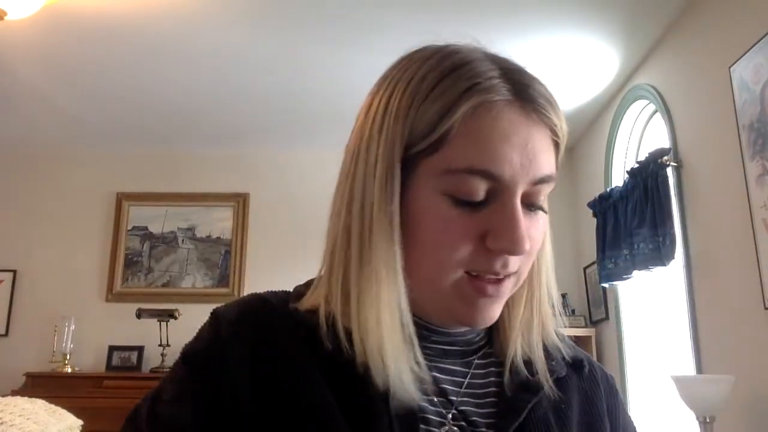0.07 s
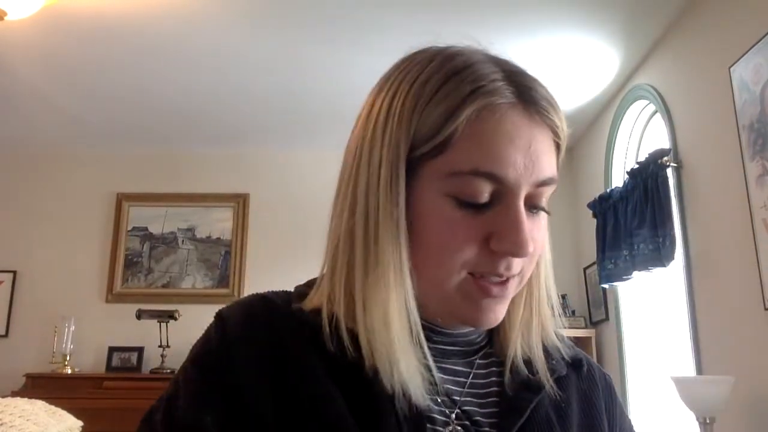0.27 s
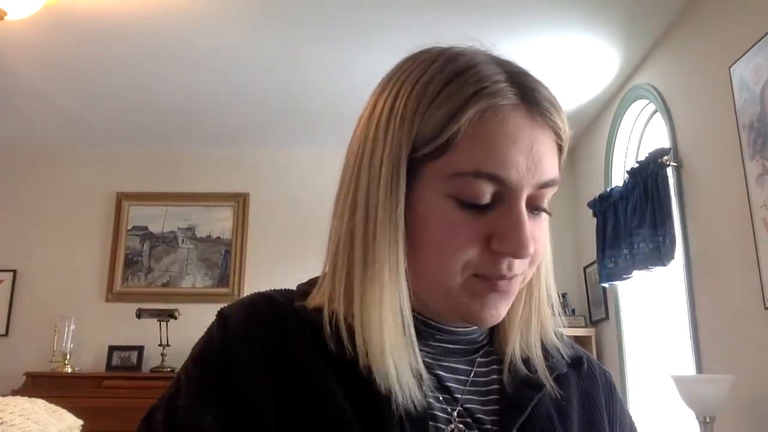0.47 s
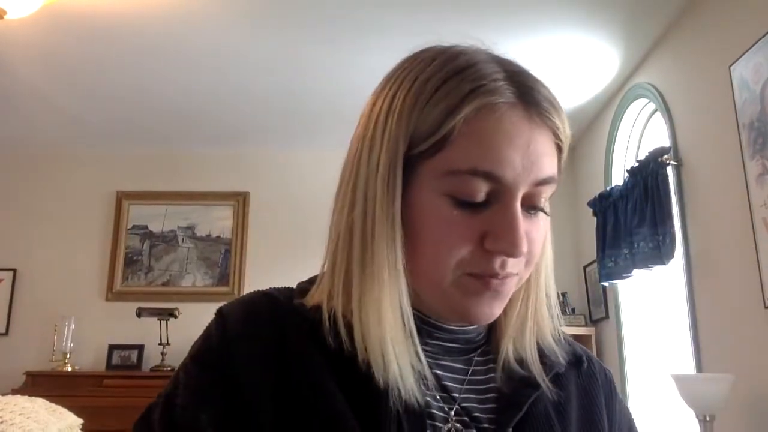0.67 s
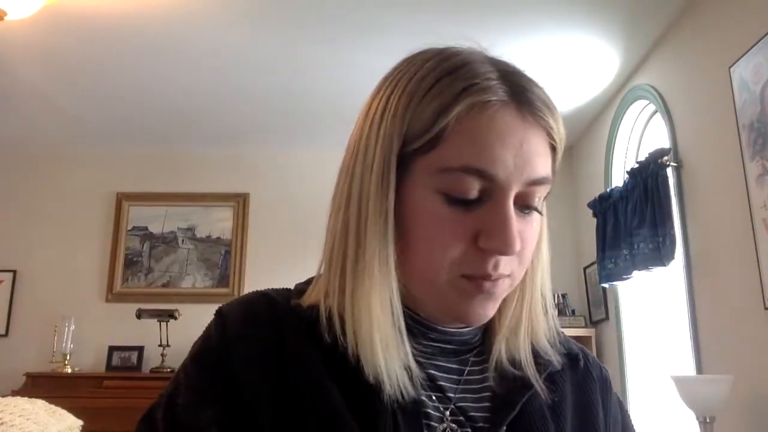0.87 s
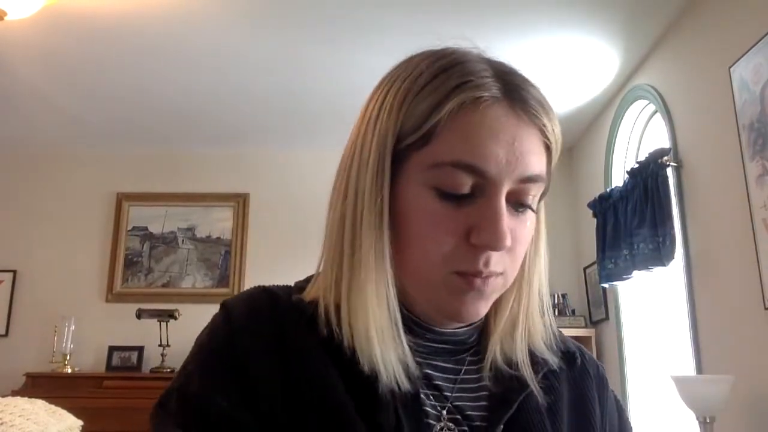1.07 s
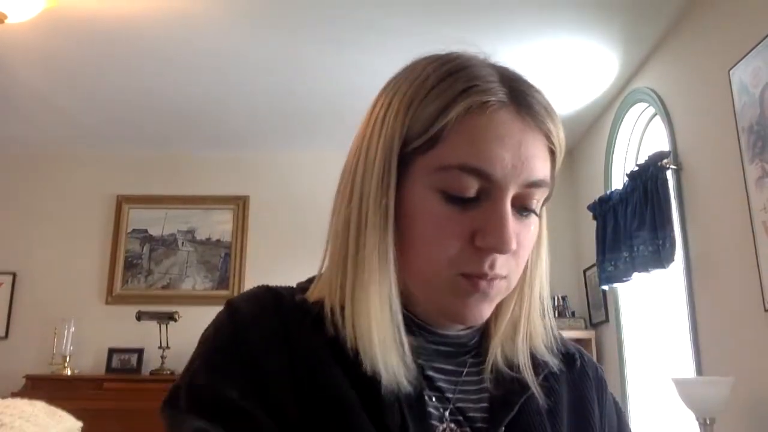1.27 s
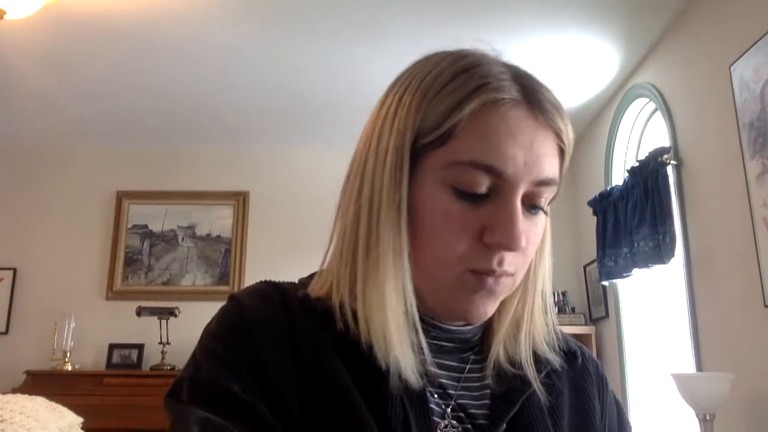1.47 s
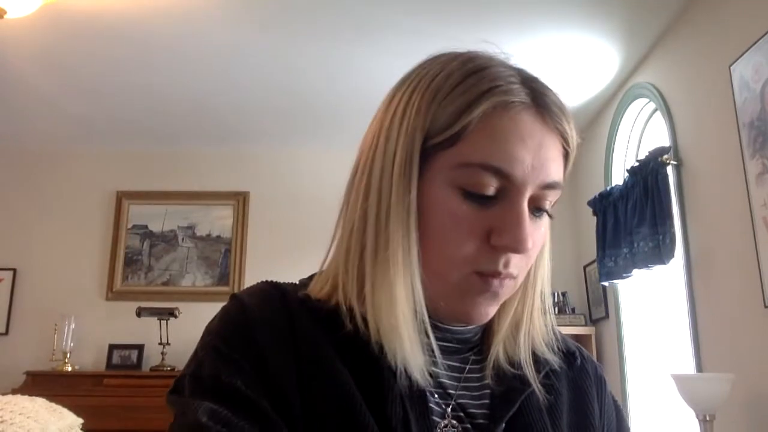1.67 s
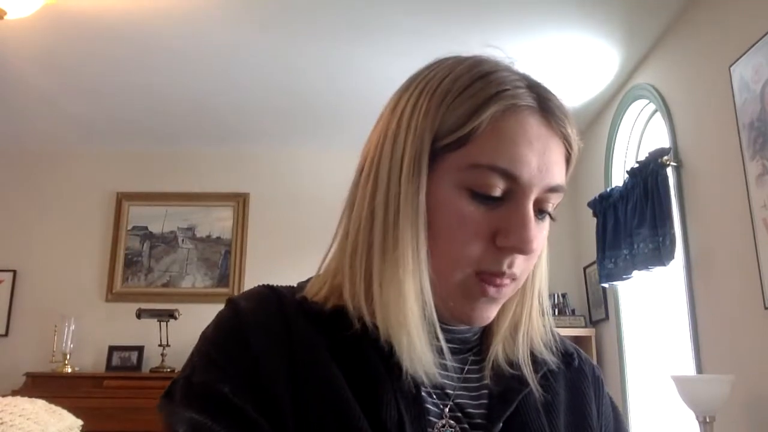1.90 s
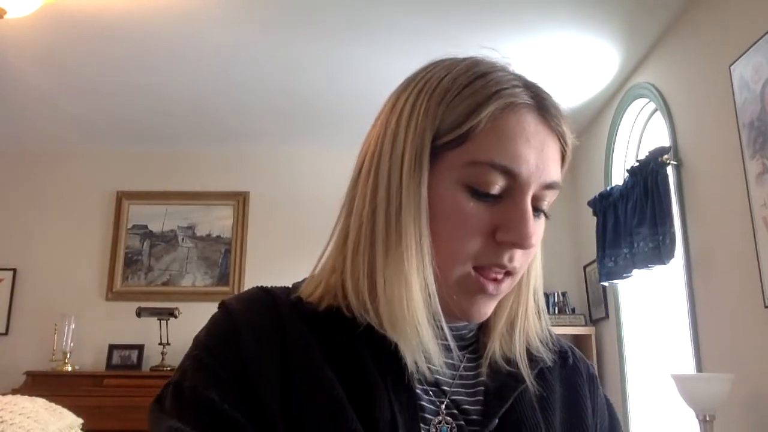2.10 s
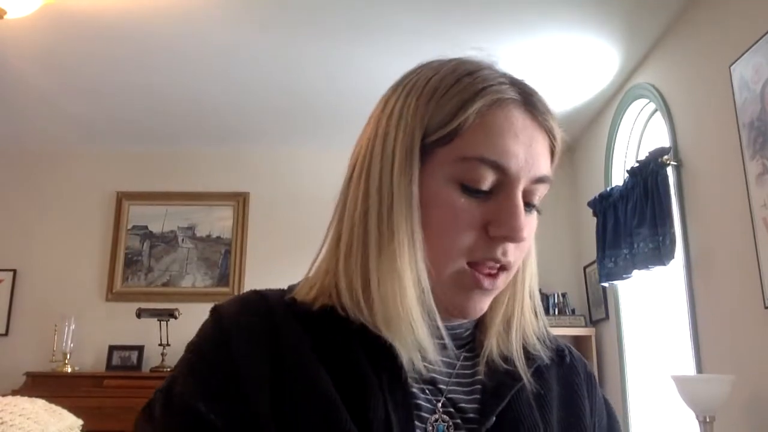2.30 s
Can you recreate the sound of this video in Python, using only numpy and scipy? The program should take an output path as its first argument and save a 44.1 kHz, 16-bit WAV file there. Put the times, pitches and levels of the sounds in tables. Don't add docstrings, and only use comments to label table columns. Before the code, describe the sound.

Plastic discs rub and tap softly, then pour with a bright clattering rattle onto a plastic tray

```python
import sys
import numpy as np
from scipy import signal
from scipy.fft import rfft, irfft
from scipy.io import wavfile
from scipy.ndimage import uniform_filter1d

SR = 44100
rng = np.random.default_rng(int(sys.argv[2]) if len(sys.argv) > 2 else 0)


def wav_out(sig):
    wavfile.write(sys.argv[1], SR, np.round(np.clip(np.atleast_2d(sig).T, -1, 1) * 32767).astype(np.int16))


def undo_db(level):
    steps = np.asarray(level, float) / 20
    return 10 ** steps


N = 103458
HIT_N = 6600
RIM_HZ, RIM_T60 = 11406, 0.023
LOW_T60 = 0.044
ROUGH, RING_ROUGH = 0.62, 0.45


# t/s, crack level/dB, tray level/dB and rim level/dB (both against the crack)
CLEAR_HITS = [(1.5435, 0, -8.5, -12.5), (1.5714, 4, -28.5, -33), (1.6173, -6, -8.5, -27),
              (1.6347, -12.5, -8.5, -34.5), (1.6638, -4.5, -16, -42.5), (1.683, -22, -3, -14.5),
              (1.6892, -3.5, -9, -18), (1.7276, -12, -4, -13.5), (1.7459, -9, -23, -13.5),
              (1.7506, 5, -34, -16.5), (1.7595, -3.5, -8, -6), (1.7679, 2.5, -34.5, -10.5), (1.7763, -3, -30, 0),
              (1.7977, -1, -17, -15.5), (1.8069, 3, -46.5, -19.5), (1.8204, -15, -37, -7),
              (1.831, -14.5, -39.5, -14.5), (1.8391, -18.5, -40, -10.5), (1.8486, -15.5, -15, -22),
              (1.1171, -4, -16, -51), (1.862, -7, -25.5, -11.5), (1.8714, -4.5, -22.5, -14.5),
           (1.8748, 7.5, -15.5, -22.5), (1.9004, -6, -40, -9), (1.9235, -7, -23, -6.5),
           (1.9309, -2, -20.5, -6.5), (1.9371, -18.5, -32, 8.5), (1.9482, -22, -39, 3),
           (1.961, -25, -22, -6.5), (1.976, -10.5, -44, -10.5), (1.9823, -7, -19, -3),
           (1.992, -15.5, -16, -18), (2.002, -20.5, -51, -3), (2.0177, 2, -26, -14),
           (2.0245, -0.5, -22, -17.5), (2.0349, -24, -34, 3), (2.1122, -17.5, -7.5, -11),
           (2.119, -2, -23, -10.5), (2.138, -11.5, -40, -23), (2.1912, -19, -29, -9.5)]


def poured_discs():
    return played(CLEAR_HITS, contact)


# f/Hz, level/dB
CRACK = [(300, -11.5), (2500, 1.5), (5400, -2), (7300, -9), (11300, -1.5), (15900, 3.5)]
# f/Hz, level/dB
UPPER = [(8480, -26)]


def contact(crack_db, tray_db, rim_db):
    pitch_1, pitch_2, faint = rng.standard_normal(3)
    crack = burst(CRACK, dying(0.0092))
    tail = burst(CRACK, dying(0.037, 0.0019))
    crack = crack + undo_db(-6) * dull(dull(tail, 5560), 5560)
    rim = mode(RIM_HZ * (1 + .003 * pitch_1), RIM_T60, rough=RING_ROUGH)
    rim = rim + .4 * mode(RIM_HZ * (1 + .006 * pitch_2), RIM_T60)
    for hz, db in UPPER:
        rim = rim + undo_db(db + 4 * faint) * mode(hz, LOW_T60)
    return undo_db(crack_db) * (undo_db(-7) * crack + undo_db(tray_db + 3.5) * tray() + undo_db(rim_db + 3) * rim)


# f/Hz, level/dB, T60/s
TRAY = [(280.8, -15, 0.16), (442.4, -12.5, 0.077), (776.3, -16, 0.14), (911, -9.5, 0.046),
        (1379, -10.5, 0.048), (1750, -11, 0.073), (2294, -5, 0.031), (3556, -2.5, 0.018)]


def tray():
    spot = rng.standard_normal((len(TRAY), 2)) * [1.5, .03]
    total = np.zeros(HIT_N)
    for (hz, db, t60), (louder_db, sharper) in zip(TRAY, spot):
        total += undo_db(db + louder_db) * mode(hz * (1 + sharper), t60)
    return total / abs(total).max()


# t/s, level/dB, f/Hz
RINGS = [(1.5732, -14.5, 6200), (1.6355, -22.5, 6280), (1.7565, -8.5, 7360), (1.7711, -6.5, 5970),
         (1.7758, -3, 7540), (1.8061, -5.5, 5945), (1.8208, -19, 6970), (1.865, -9.5, 6140),
         (1.9011, -17.5, 7460), (1.923, -8, 7480), (1.9361, -5, 7420), (1.9614, -18.5, 7500),
         (1.9806, -14.5, 7230), (1.9906, -10, 7500), (2.024, -12.5, 6610), (1.7284, -28.5, 7500),
         (1.906, -19.5, 6100), (1.976, -17.5, 7500), (2.0159, -10.5, 7400), (2.181, -30.5, 7500),
         (2.192, -31, 7500), (2.203, -34, 7500), (1.7764, -7.5, 8480), (1.923, -9.5, 8480),
         (1.856, -12.5, 7500), (2.12, -21, 4900), (2.138, -20.5, 4900)]


def free_rings():
    return played(RINGS, lambda db, hz: undo_db(db - 5) * mode(hz, LOW_T60, rough=RING_ROUGH))


# t/s, level/dB
CHATTER = [
    (1.55, -62.5),
    (1.729, -47),
    (1.76, -26),
    (2.03, -34),
    (2.11, -32),
    (2.13, -25),
    (2.214, -38),
    (2.239, -73),
]


def chatter():
    out = np.zeros(N)
    level = undo_db(np.interp(np.arange(N) / SR, *np.transpose(CHATTER), left=-200))
    contacts_per_s = 360
    for low_hz in (8310, 7500, 7400, 4900):
        strength = undo_db(2.7 * np.minimum(rng.exponential(1, N), 2.6))
        happens = rng.random(N) < contacts_per_s / 4 / SR
        hit = contact(0, -13.5, -13) + undo_db(-12) * mode(low_hz, LOW_T60)
        out += signal.oaconvolve(strength * happens * level, hit)[:N]
    return out


# t/s, crack level/dB
TICKS = [(.952, -36), (.9635, -50), (1.553, -24), (1.561, -27), (1.6027, -30), (1.6084, -29), (1.628, -30),
         (1.6445, -33), (1.674, -34), (1.700, -29), (1.718, -31), (1.764, -14), (1.7846, -11), (1.800, -17),
         (1.803, -19), (1.8125, -19), (1.856, -22), (1.867, -13), (1.891, -25), (1.906, -22), (1.913, -25),
         (1.956, -27), (1.996, -23), (2.009, -24), (2.0135, -26), (2.029, -18), (2.045, -27), (2.0685, -20),
         (2.0815, -27), (2.087, -25), (2.1015, -28), (2.129, -20), (2.1425, -17), (2.149, -19),
         (2.154, -22), (2.161, -24), (1.2295, -21)]


def brushing_ticks():
    return played(TICKS, tick)


def tick(crack_db):
    hz = RIM_HZ * (1 + .006 * rng.standard_normal())
    puff = coloured(rng.standard_normal(HIT_N) * dying(.016, .0006), CRACK)
    return undo_db(crack_db) * (undo_db(-5) * puff + undo_db(-10) * mode(hz, RIM_T60))


# t/s, level/dB, f/Hz, ring level/dB against the tap
TAPS = [(0.472, -40, 1715, 7), (0.664, -18, 2056, 3.5), (0.699, -43.5, 2480, 12), (0.923, -21, 2920, -4.5),
        (0.951, -10.5, 1780, -17.5), (0.946, -32, 2020, -4), (0.957, -20.5, 2440, -23),
        (0.9796, -25.5, 1470, -14.5), (0.971, -20, 1600, -11), (0.984, -17, 2200, -14),
        (1.029, -15.5, 1450, -10.5), (1.047, -14.5, 3050, -17), (1.06, -21, 1770, -23),
        (1.0682, -26, 1500, -12), (1.073, -33.5, 1360, -13.5), (1.08, -42, 1500, -11.5),
        (1.142, -20, 2990, -5), (1.18, -23, 2350, -11), (1.228, -18, 2545, -6)]


def held_taps():
    return played(TAPS, tap)


# f/Hz, level/dB
TAP = [(560, -5.5), (1800, 5), (3200, -0.5), (5500, -19), (7000, -46)]


def tap(level_db, hz, ring_db):
    knock = burst(TAP, dying(0.0076) + undo_db(-22) * dying(0.12))
    ring = mode(hz, 0.023, 0.0014)
    bright = burst(RUSTLE, dying(0.018))
    return undo_db(level_db) * (undo_db(-10) * knock + undo_db(ring_db) * ring + undo_db(-35) * bright)


# t/s, level/dB, f/Hz
PINGS = [(.471, -36.5, 3310), (.471, -39, 3880), (0.662, -26.5, 2550), (0.663, -40, 3770),
         (.664, -32, 4570), (0.6974, -40.5, 3200), (.708, -37, 2320), (0.679, -47, 2020),
         (0.952, -25, 1020), (.982, -30, 1145), (1.028, -23, 645), (1.545, -32, 9900), (1.559, -33, 4890),
         (.923, -31, 1570), (0.922, -41, 4240), (0.922, -42.5, 5850), (1.69, -19, 3670),
         (2.117, -15.5, 4000)]


def tap_pings():
    return played(PINGS, lambda db, hz: undo_db(db) * mode(hz, 0.022))


# f/Hz, level/dB
ROCKER = [(1170, -9), (1700, -12), (1890, -4.5), (3740, -3.5), (4100, -7)]
# t/s, level/dB
ROCKS = [
    (0.508, -41),
    (0.5161, -40.5),
    (0.533, -51),
    (.540, -52),
    (0.546, -56),
    (0.551, -48),
    (0.557, -51),
    (0.566, -58),
]


def rocking_disc():
    return played(ROCKS, lambda knock_db: sum(undo_db(knock_db + db) * mode(hz, 0.039) for hz, db in ROCKER))


# f/Hz, level/dB, T60/s
THUD = [(231, -2, 0.075), (422, 2, 0.05), (776, 4.5, 0.097), (840, 14, 0.01), (1340, -3, 0.024),
        (1970, -2.5, 0.0083)]


def tray_thud():
    hum = sum(undo_db(db) * mode(hz, t60, rough=0) for hz, db, t60 in THUD)
    knock = burst(TAP, dying(.04))
    out = np.zeros(N)
    add(out, 1.0908, dull(undo_db(-16.5) * hum + undo_db(-23) * knock, 4500))
    return out


# t/s, level/dB, f/Hz
BUMPS = [
    (.088, -36, 947),
    (.665, -37, 774),
    (0.766, -46.5, 250),
    (1.207, -29.5, 401),
    (1.21, -29, 769),
    (1.76, -14, 263),
]


def soft_bumps():
    return played(BUMPS, lambda db, hz: undo_db(db) * mode(hz, 0.11, rise_s=0.014))


# f/Hz, level/dB
SCRAPE = [(1500, -17), (2150, 0), (2900, -2.5), (3750, -0.5), (4400, -4), (5000, -6), (6000, -14.5),
          (7500, -33)]
# f/Hz, level/dB
RUSTLE = [(7500, -27.5), (10000, -13), (12500, -2), (15900, 2.5)]
# f/Hz, level/dB
RUMBLE = [(30, -19), (120, -9), (230, -1.5), (550, -8), (850, -8.5), (1200, -11.5)]
# start t/s, end t/s, scrape level/dB, rustle level/dB, rumble level/dB
STROKES = [(-.05, 0.144, -42.5, -43.5, -65), (0.187, 0.255, -70, -61.5, -72), (0.288, 0.373, -69, -54, -78),
           (0.458, 0.57, -66, -54, -81), (0.57, 0.641, -74.5, -49.5, -90), (0.662, 0.724, -54, -45, -66.5),
           (0.739, 0.791, -55, -42, -60.5), (0.922, 0.97, -66, -49.5, -81), (1.095, 1.222, -40.5, -35, -35),
           (1.19, 1.289, -45, -47.5, -46.5), (1.27, 1.384, -54, -61, -69),
           (1.404, 1.483, -47.5, -42.5, -59.5), (1.49, 1.542, -64.5, -57, -63),
           (1.541, 1.77, -42, -52, -52), (1.7, 2.2, -52.5, -52.5, -59.5), (2.114, 2.16, -31.5, -28.5, -63)]
FLOOR_DB = (-73.5, -74, -75.5)


def friction(layer, points):
    grains = undo_db(1.5 * evened(uniform_filter1d(rng.standard_normal(N), 90)))
    bands = signal.stft(rng.standard_normal(N) * grains, nperseg=256)[2]
    patches = uniform_filter1d(rng.standard_normal(bands.shape), 7, 0)
    patches = evened(uniform_filter1d(patches, 16, 1))
    noise = signal.istft(bands * undo_db(5 * patches), nperseg=256)[1][:N]
    t = np.arange(N) / SR
    power = undo_db(FLOOR_DB[layer]) ** 2
    for start, end, *db in STROKES:
        inside = np.minimum(t - start, end - t)
        shape = np.clip(inside / 0.024 + .5, 0, 1)
        power = power + (undo_db(db[layer]) * shape) ** 2
    return evened(coloured(noise, points)) * np.sqrt(power)


def room(x):
    t = np.arange(SR // 4) / SR
    tail = rng.standard_normal(len(t)) * undo_db(-60 * t / 0.2) * (t > .004)
    echo = signal.oaconvolve(x, tail / np.linalg.norm(tail))[:N]
    return dull(dull(echo, 3500), 3500)


def played(rows, sound):
    mix = np.zeros(N)
    for s, *row in rows:
        add(mix, s, sound(*row))
    return mix


def add(mix, s, sound):
    part = mix[round((s + .24 / 343) * SR):][:len(sound)]
    part += sound[:len(part)]


def mode(hz, t60, rise_s=0.00054, rough=ROUGH):
    wobble = uniform_filter1d(uniform_filter1d(rng.standard_normal(HIT_N), 90), 90)
    flutter = 1 + rough * evened(wobble)
    return dying(t60, rise_s) * flutter * np.sin(2 * np.pi * hz * np.arange(HIT_N) / SR)


def burst(points, envelope):
    touch = rng.standard_normal(len(envelope))
    touch[8] = 5
    return coloured(touch * envelope, points)


def dying(t60, rise_s=.0002):
    t = np.arange(HIT_N) / SR
    return np.minimum(t / rise_s, 1) * undo_db(-60 * t / t60)


def coloured(x, points):
    f, db = np.transpose(points)
    hz = np.fft.rfftfreq(2048, 1 / SR) + 1
    octaves_outside = np.maximum(np.log2(f[0] / hz), 0) + np.maximum(np.log2(hz / f[-1]), 0)
    curve_db = np.interp(np.log(hz), np.log(f), db) - 50 * octaves_outside
    cepstrum = irfft(np.log(undo_db(np.maximum(curve_db, -90))))
    cepstrum[1:1024] *= 2
    taps = irfft(np.exp(rfft(cepstrum[:1025], 2048)))
    return signal.oaconvolve(x, taps / np.linalg.norm(taps))[:len(x)]


def dull(x, hz):
    return signal.lfilter(*signal.butter(2, hz, fs=SR), x)


def low_cut(x, order, hz):
    return signal.sosfilt(signal.butter(order, hz, "high", fs=SR, output="sos"), x)


def evened(x):
    return x / np.sqrt(np.mean(x ** 2) + 1e-20)


def gated(x):
    body = signal.sosfiltfilt(signal.butter(4, 7000, fs=SR, output="sos"), x)
    treble = x - body
    weak = uniform_filter1d(treble ** 2, 130) < undo_db(2 * -17) * uniform_filter1d(body ** 2, 130)
    return body + treble * undo_db(-14 * uniform_filter1d(weak * 1., 60))


def scene():
    rubs = friction(0, SCRAPE) + friction(1, RUSTLE) + friction(2, RUMBLE)
    hits = chatter() + poured_discs() + free_rings() + soft_bumps()
    hits += low_cut(held_taps() + tap_pings(), 5, 594)
    hits += rocking_disc() + brushing_ticks()
    hits = low_cut(hits, 2, 200)
    hits += tray_thud()
    return (hits + undo_db(-24) * room(hits) + rubs)[None]


def top_cut(x):
    return signal.sosfilt(signal.butter(12, 16970, fs=SR, output="sos"), x)


def record(dry):
    band = low_cut(gated(dry), 2, 150)
    band = signal.sosfilt(signal.ellip(6, .2, 25, 15900, fs=SR, output="sos"), band)
    limit = .72
    limited = np.tanh(band / limit) * limit
    mix = signal.sosfilt(signal.ellip(10, .2, 95, 16800, fs=SR, output="sos"), limited)
    return top_cut(mix)


dry = scene()
out = record(dry)
wav_out(out)
```